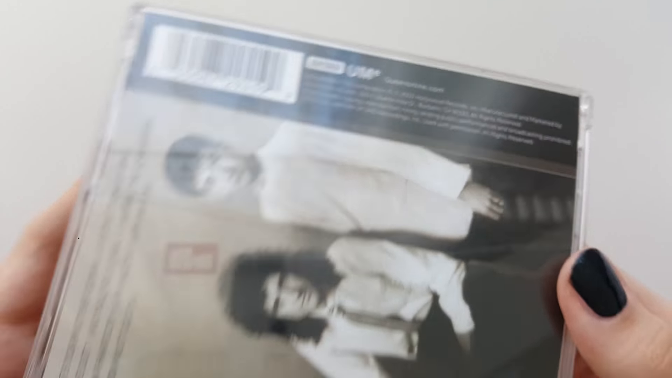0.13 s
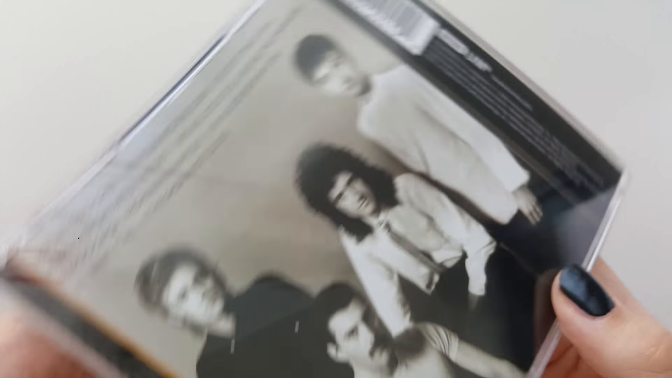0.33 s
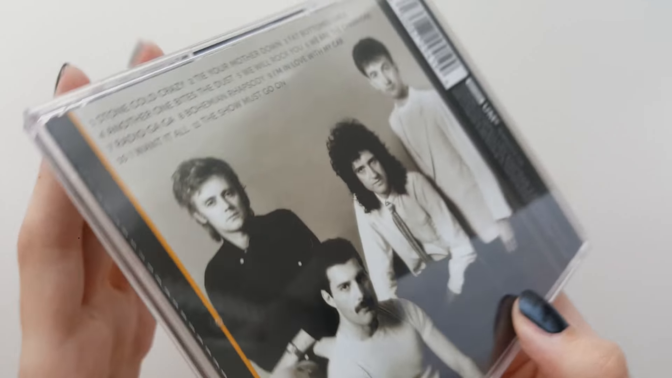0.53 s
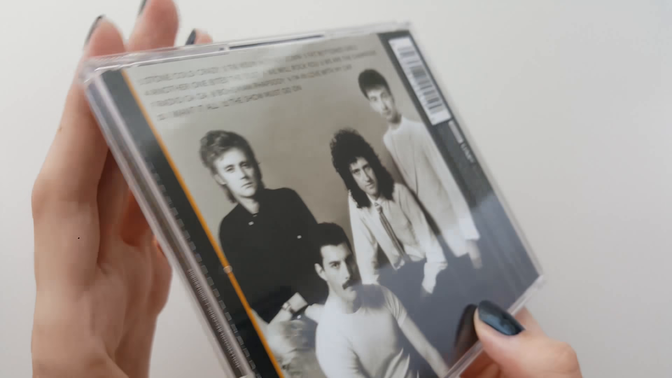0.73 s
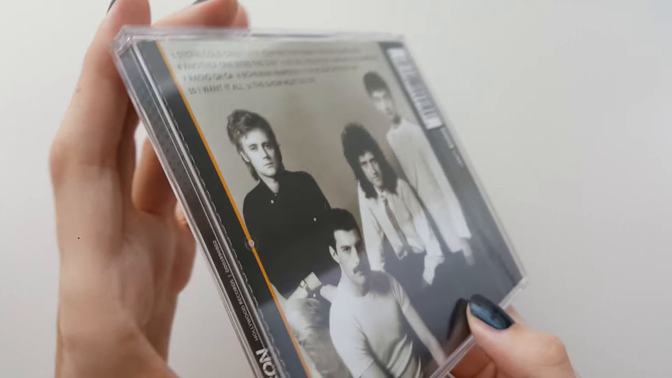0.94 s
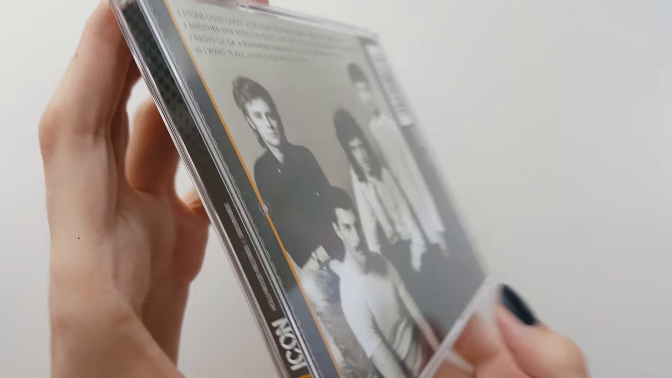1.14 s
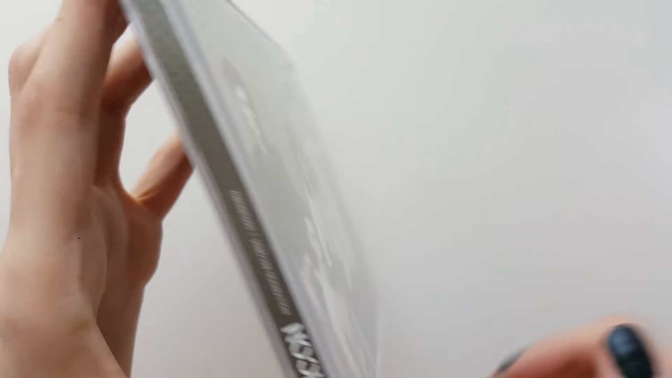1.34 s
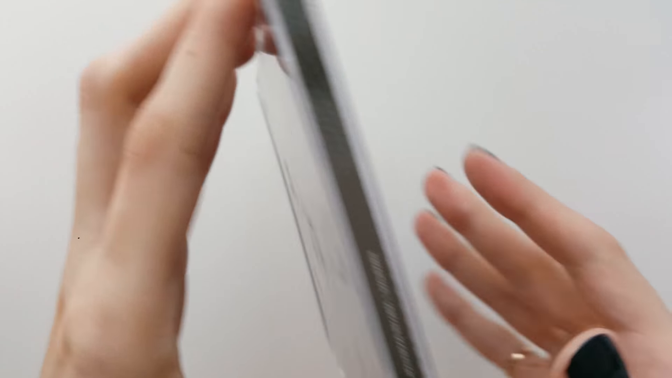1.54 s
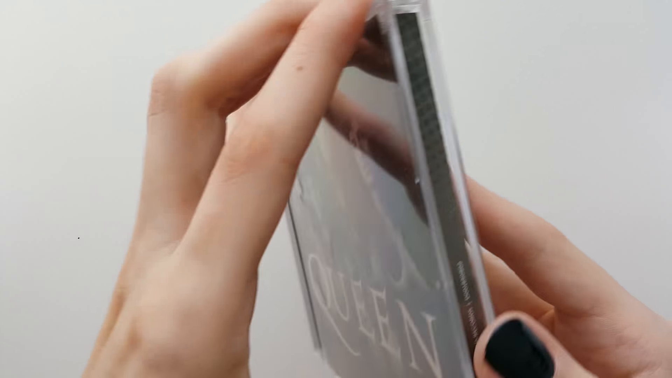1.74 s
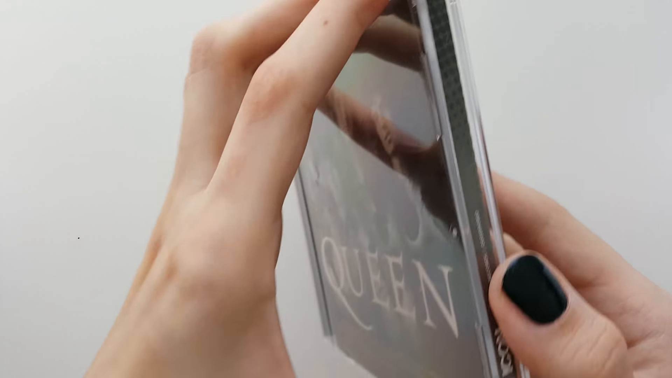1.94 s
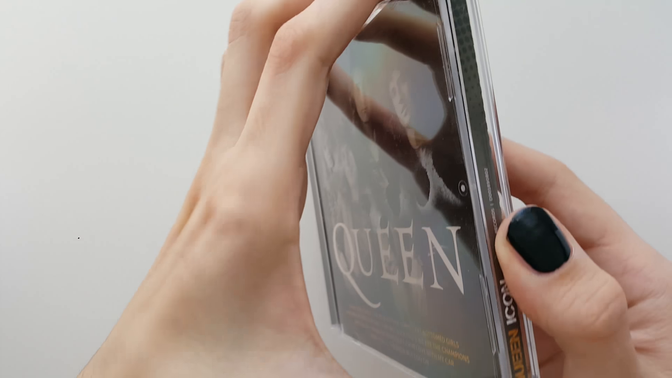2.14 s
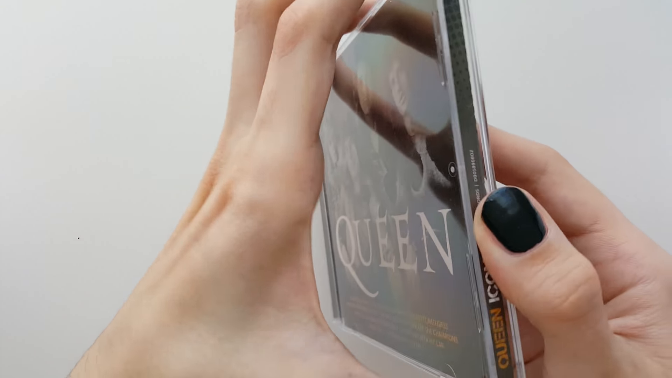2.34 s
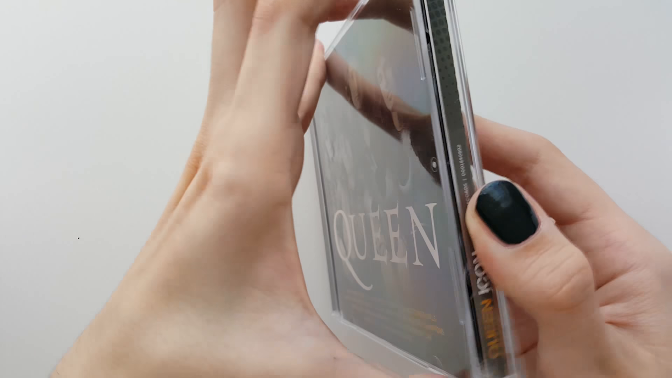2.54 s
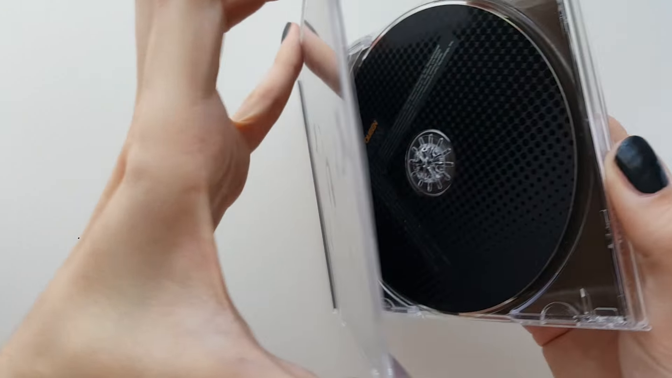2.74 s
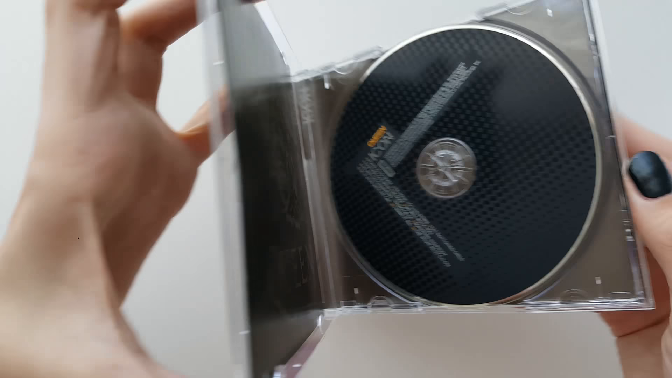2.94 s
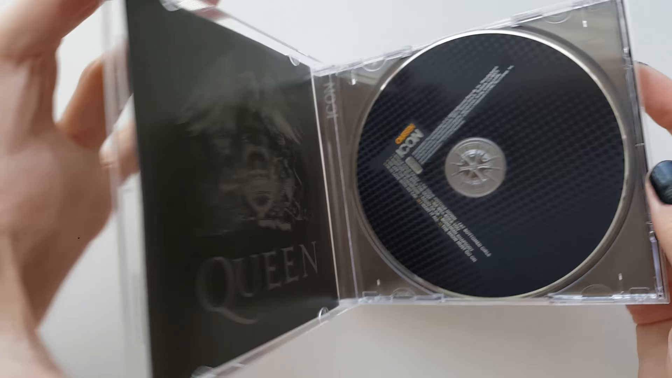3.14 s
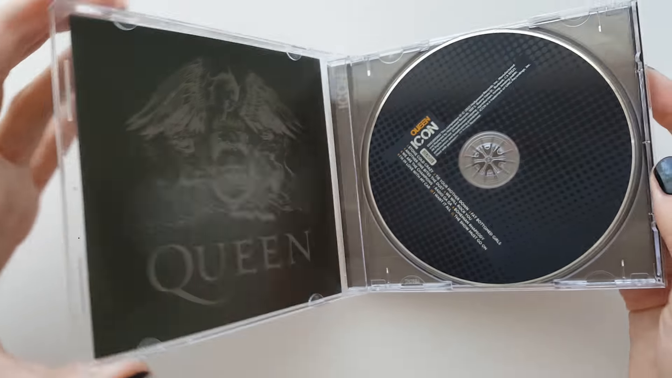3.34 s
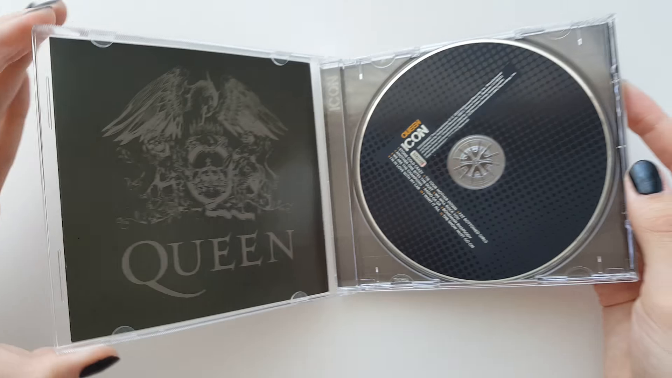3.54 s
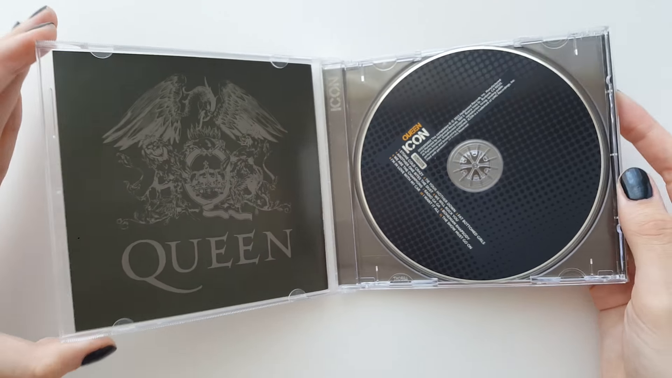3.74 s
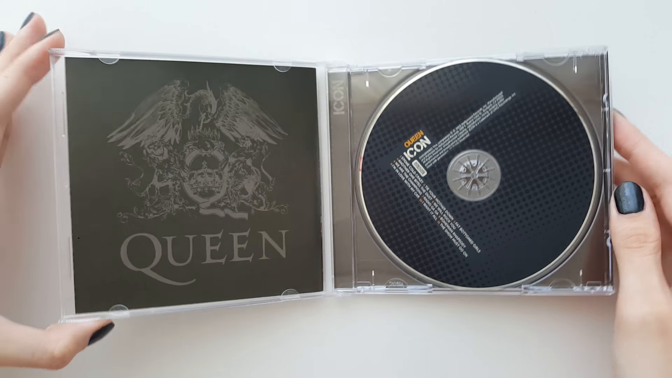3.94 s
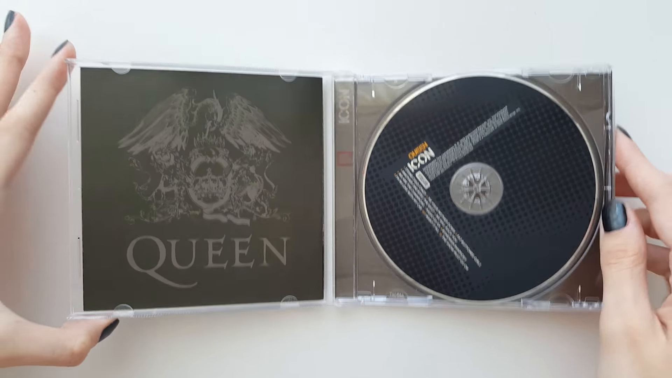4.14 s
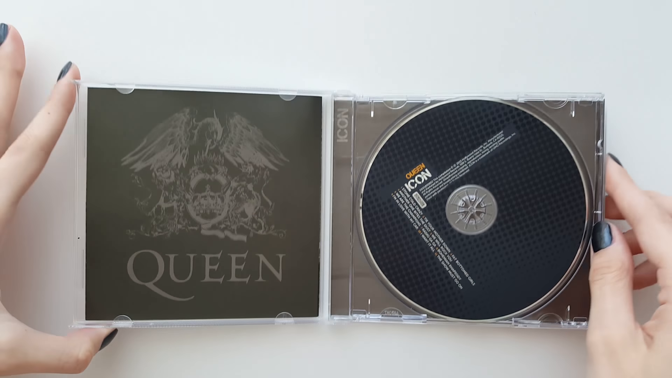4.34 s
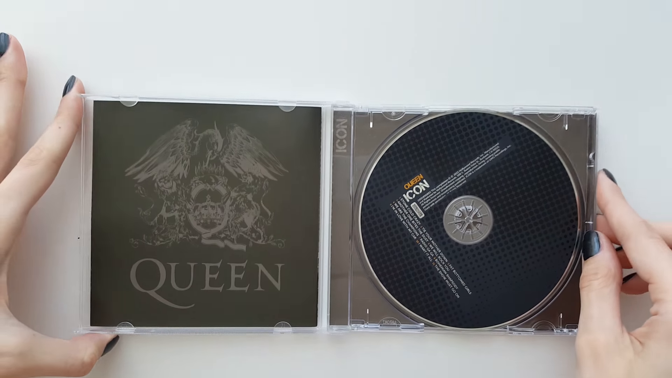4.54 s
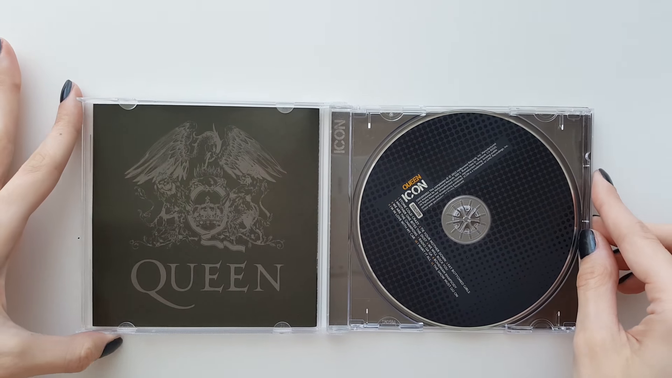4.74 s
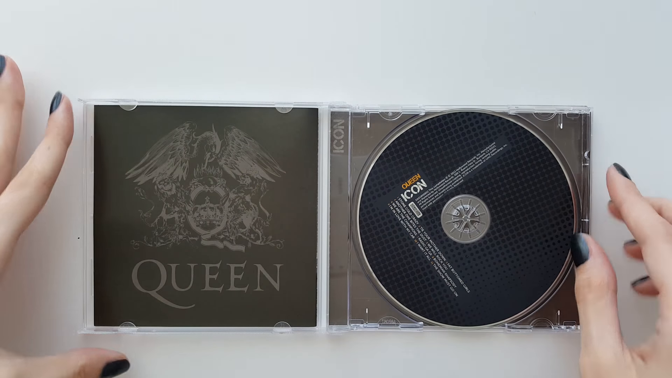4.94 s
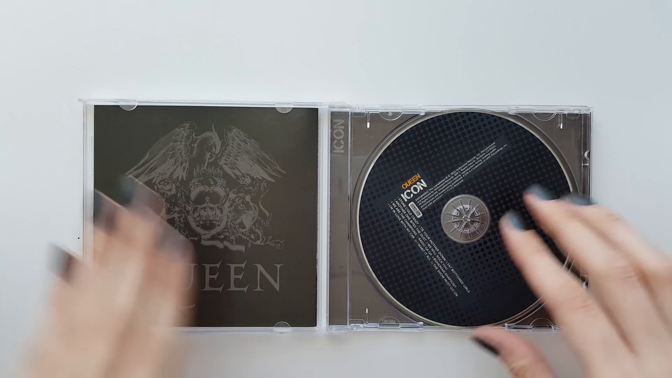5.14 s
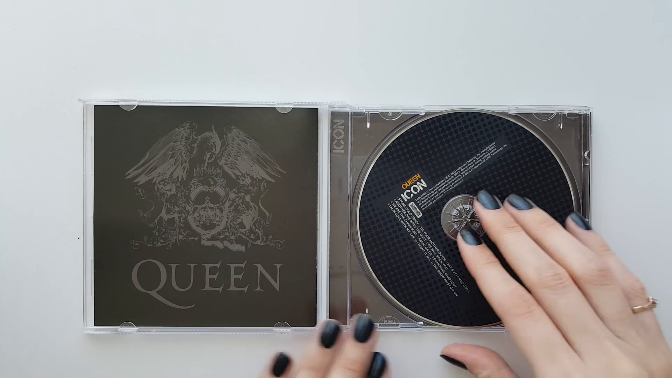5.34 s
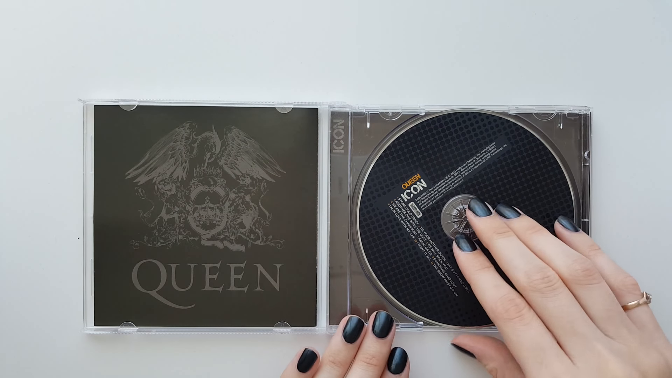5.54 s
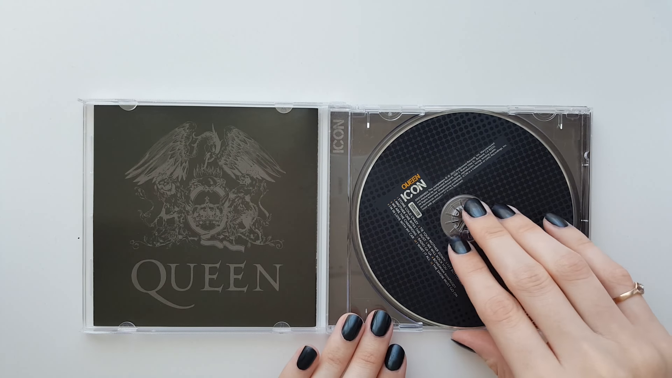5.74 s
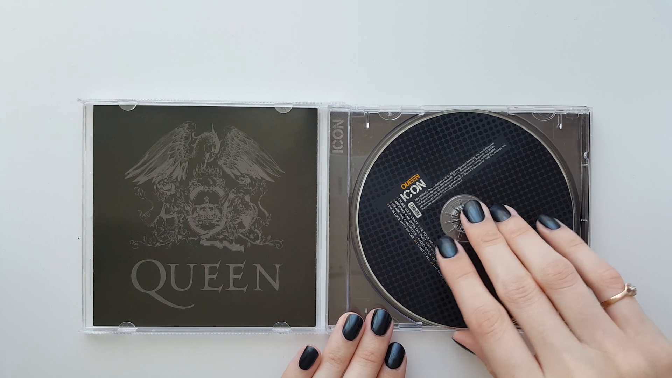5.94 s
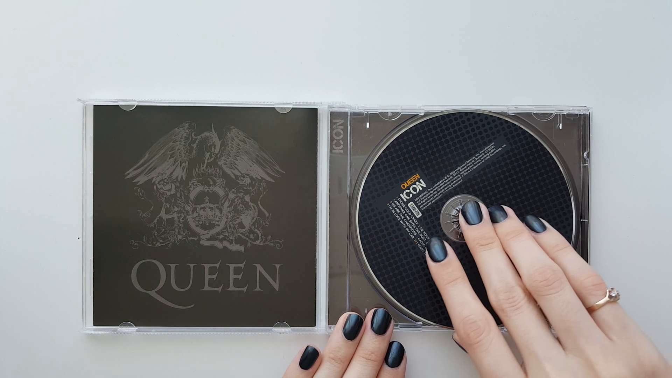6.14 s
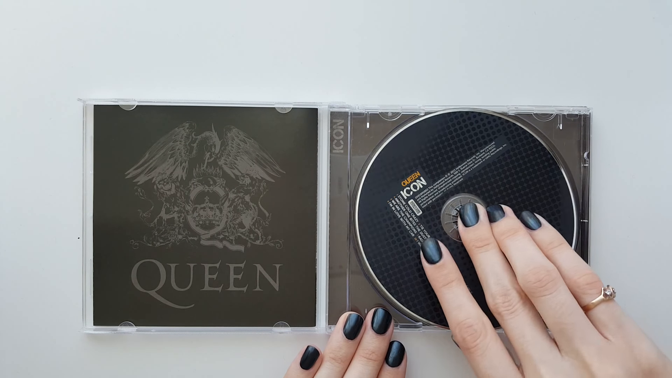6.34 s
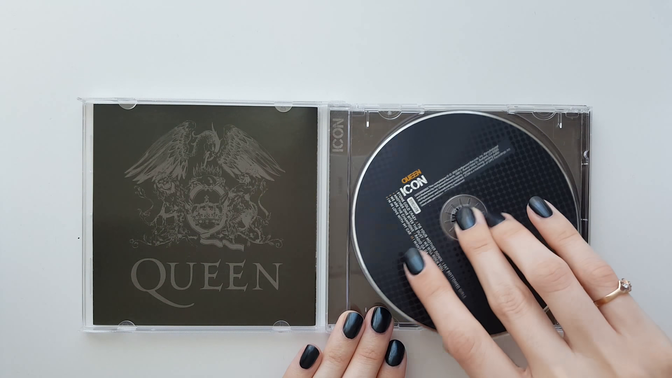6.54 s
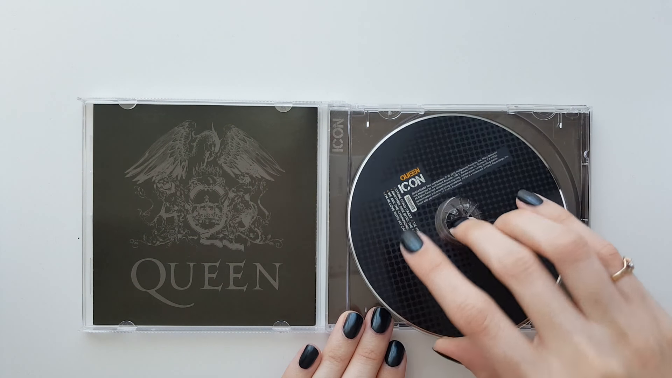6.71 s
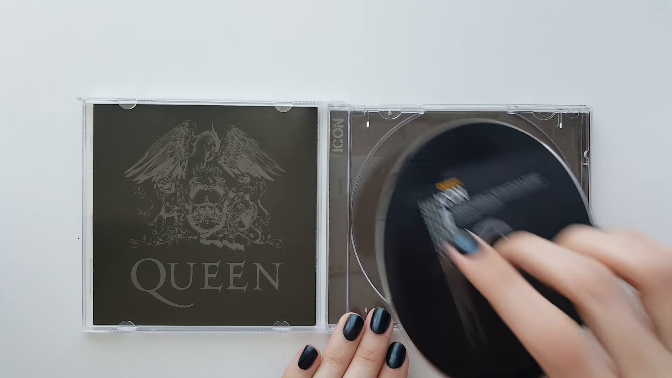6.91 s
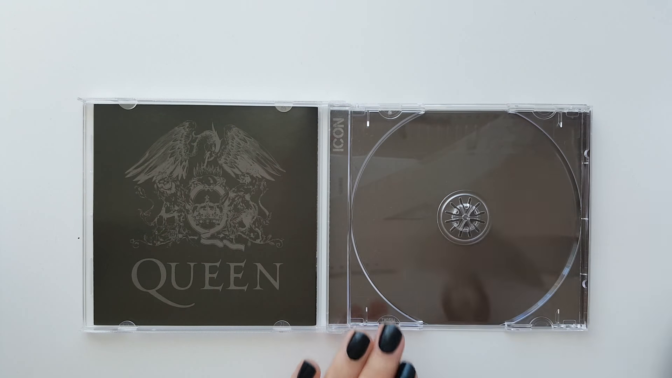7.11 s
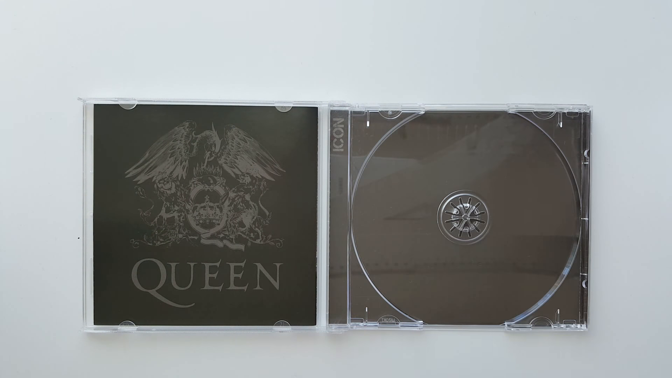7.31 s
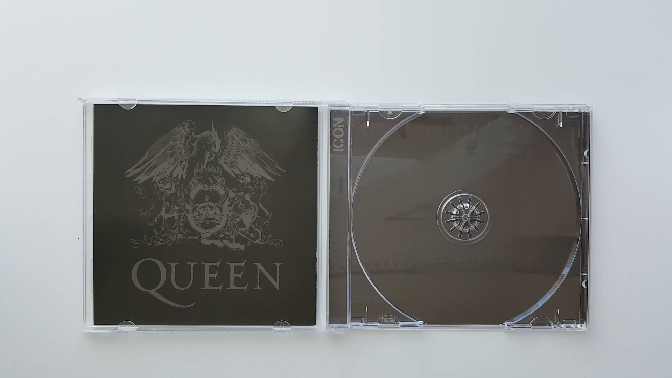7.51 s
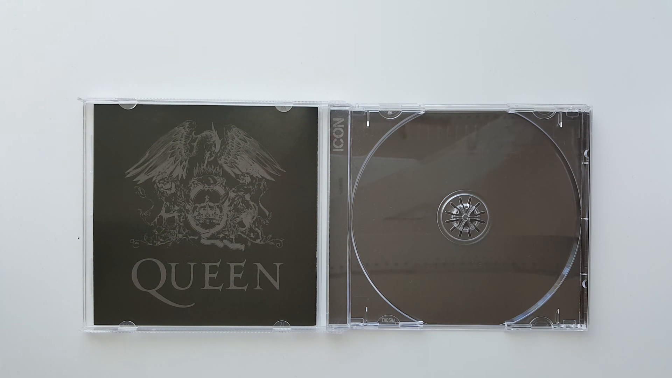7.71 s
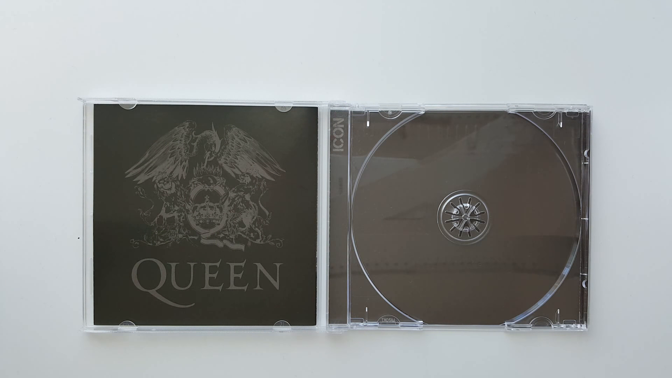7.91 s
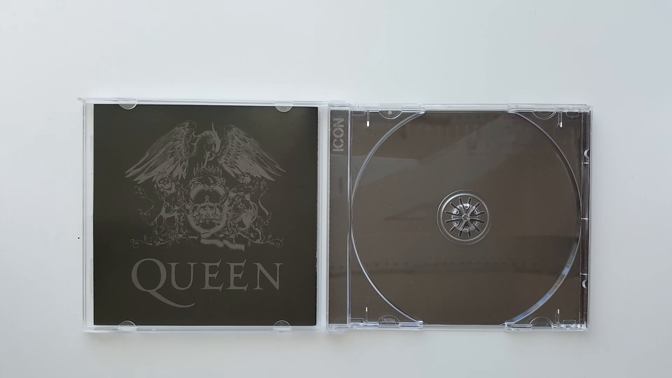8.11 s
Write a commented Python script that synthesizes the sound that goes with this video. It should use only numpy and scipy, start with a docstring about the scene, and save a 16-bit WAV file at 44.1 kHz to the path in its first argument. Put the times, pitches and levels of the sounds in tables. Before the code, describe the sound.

Thin hard plastic case is handled, creaks and clicks open, clatters flat on a table, then a disc snaps sharply off its hub.

```python
"""A plastic disc case is turned over in the hands, prised open, laid on a table and its disc popped off the hub.
Each contact is a short dense noise burst, filtered by the modes and broad colour of the struck plate.
Friction is noise in uneven slips under a swelling pressure; slipping skin and the tapped disc hum briefly.
A small, hard room adds a decaying tail; air noise, hiss and a faint whine lie behind.
Two microphone ports listen from close by."""
import sys
import numpy as np
from scipy import signal
from scipy.fft import rfft, irfft
from scipy.io import wavfile
from scipy.ndimage import uniform_filter1d

SR = 44100
rng = np.random.default_rng(int(sys.argv[2]) if len(sys.argv) > 2 else 0)


def put_to_file(sound):
    """Save the sound as 16-bit audio at rate SR, in the file named by the first command-line argument."""
    columns = np.atleast_2d(sound).T  # one column per channel
    safe = np.clip(columns, -1, 1)
    whole_steps = np.round(safe * 32767)
    wavfile.write(sys.argv[1], SR, whole_steps.astype(np.int16))


N = 360268
SIZE = 2 ** 15  # samples in a burst or a room response
HZ = np.fft.rfftfreq(SIZE, 1 / SR)

# In the blow tables the level is the rms over 10 ms, before hardness and thump reshape the spectrum;
# strokes give their peak level, hums their own rms.
# Hardness is a spectral tilt: a nail lies above 0, a fingertip below.
# Broad colour of the tray: f/Hz, level/dB (per Hz)
TRAY_COLOUR = [(45, -13), (95, 4.5), (175, -3.5), (250, 1.5), (350, -1), (550, -6), (750, -6.5),
               (1300, -7.5), (2800, -12), (3600, -17), (6000, -25), (10000, -34), (15000, -48)]
# Modes of the tray: f/Hz, width/Hz, lift/dB
TRAY_RESONANCES = [(107.6, 15, 4.5), (141.4, 6, 6.6), (333, 25, 5.2), (390, 7.6, 7.8), (547, 44, 12)]


def gain_of(db):
    """Level law: twenty decibels are a factor of ten in amplitude."""
    return 10 ** (np.asarray(db) / 20)


def evened(x):
    """Normalisation: scales a signal to an rms of one."""
    return x / np.sqrt(np.mean(x ** 2) + 1e-20)


def read(points, hz):
    """Interpolation: reads a curve on a log-frequency axis."""
    f, value = np.transpose(points)
    return np.interp(np.log(hz + 1), np.log(f + 1), value)


def add(mix, s, sound):
    """Superposition: mixes a two-channel sound in at time s."""
    part = mix[:, round(s * SR):][:, :sound.shape[1]]
    part += sound[:, :part.shape[1]]


def causal(db):
    """Minimum phase: the response with these levels that rings only after it is struck."""
    log_gain = np.log(gain_of(np.concatenate([db, db[-2:0:-1]])))
    return np.exp(np.conj(signal.hilbert(log_gain)))[:len(db)]


def levelled(waves, size):
    """Whitening: spectra without their broad humps and dips; fine ripple and the attack stay."""
    spectra = []
    for z in rfft(waves, SIZE):
        power = uniform_filter1d(abs(z) ** 2, size=size)
        spectra.append(z / causal(10 * np.log10(power + 1e-9)))
    return np.array(spectra)


def at_ports(pair, colour=None):
    """Diffuse-field coherence: long waves reach both ports alike, short ones do not."""
    # Likeness of diffuse sound at the two ports: f/Hz, correlation/1
    likeness = [(60, 0.96), (340, 0.46), (560, 0.31), (1000, 0.0082), (2500, 0.022), (5000, -0.047)]
    hz = np.fft.rfftfreq(pair.shape[1], 1 / SR)
    same = np.clip(read(likeness, hz), -1, 1)
    gain = 1 if colour is None else gain_of(read(colour, hz))
    mid, side = rfft(pair) * np.sqrt([1 + same, 1 - same]) * gain
    return evened(irfft(np.array([mid + side, mid - side]), pair.shape[1]))


def background(air_db=-67.0, hiss_db=-82, whine_hz=1362):
    """Steady noise floor: room rumble, a thin electrical whine mostly on the right, and microphone hiss."""
    # Colour of the room air: f/Hz, level/dB (per Hz)
    air_colour = [(10, -9.5), (38, -10.5), (58, 1), (105, -8), (141, -1), (175, -10), (280, -11.5),
                  (450, -15.5), (1300, -19.5), (3000, -23.5), (6000, -30), (10000, -34), (15800, -32)]
    # Colour of the microphone hiss: f/Hz, level/dB (per Hz)
    hiss_colour = [(100, -14.5), (9500, -9), (12500, 2.5), (15800, 3.5)]
    # Whine at the ports: left level/dB, right level/dB
    whine_db = (-96, -78)
    air = gain_of(air_db) * at_ports(rng.standard_normal((2, N)), air_colour)
    tone = evened(np.sin(2 * np.pi * whine_hz * np.arange(N) / SR))
    whine = tone * gain_of(whine_db)[:, None]
    hiss = gain_of(hiss_db) * at_ports(rng.standard_normal((2, N)), hiss_colour)
    return air + whine + hiss


def flutter(rise_ms, fall_ms, grit_db):
    """Dispersive bending waves cross a plate and die away: spectra of a burst, gritty where an edge catches."""
    ms = 1000 * np.arange(SIZE) / SR
    build_up = 1 - np.exp(-ms / max(rise_ms, .02))
    decay = np.exp(-ms / max(fall_ms, .5))
    catches = evened(uniform_filter1d(rng.standard_normal(SIZE), size=60))
    burst = rng.standard_normal((2, SIZE)) * build_up * decay * gain_of(grit_db * catches)
    return levelled(burst, size=110)


def blows(rows, body, modes, rise_ms, fall_ms, thump_db, lead_ms, spread,
          grit_db=1, thump_hz=300, pivot_hz=1200, split_hz=580):
    """Impact excitation of plate modes: a hard contact is bright and sudden, a soft one thumps."""
    soft_thump_db, soft_slowing = 0.95, .15  # added thump and log build-up time per dB/octave softer
    margin = 64  # samples that let either port hear the blow first
    resonance_db = sum(lift / (1 + (2 * (HZ - f) / width) ** 2) for f, width, lift in modes)
    colour_db = read(body, HZ) + resonance_db
    colour_db = colour_db - 10 * np.log10(np.mean(gain_of(colour_db) ** 2))
    # above the bass, the plate sends each port a different wave
    apart = np.clip(spread, 0, 1) * HZ ** 4 / (HZ ** 4 + split_hz ** 4)
    # the left port leads by lead_ms: half the delay goes to each side
    turn = np.exp(1j * np.pi * HZ * lead_ms / 1000)
    out = np.zeros((2, N))
    for s, db, hardness in rows:
        low_db = (thump_db - soft_thump_db * hardness) / (1 + (HZ / thump_hz) ** 4)
        tilt_db = hardness * np.log2(np.maximum(HZ / pivot_hz, 1 / 2))
        burst = flutter(rise_ms * np.exp(-soft_slowing * hardness), fall_ms, grit_db)
        mid, side = burst * np.sqrt([1 - apart ** 2, apart ** 2])
        ports = np.array([(mid + side) * turn, (mid - side) / turn])
        z = ports * causal(colour_db + low_db + tilt_db + db)
        wave = np.roll(irfft(z), margin, axis=1)[:, :SIZE // 2]
        # the level counts the energy as spread over 10 ms
        add(out, s - margin / SR, wave * np.sqrt(SR / 100))
    return out


def by_force(rows, hardness=0., per_db=0.):
    """Hardness by level: that of the strongest blow, plus per_db times each blow's level relative to it."""
    top_db = max(db for s, db in rows)
    return [(s, db, hardness + per_db * (db - top_db)) for s, db in rows]


def finger_taps():
    """Impact: fingers tap the shut case, whose plates ring briefly."""
    # Taps: t/s, level/dB, hardness/(dB/octave)
    taps = [(.059, -67, -2.5), (.827, -61.5, -1), (.8765, -50, 2.5), (.888, -51.5, 3.5),
            (.9425, -54.5, 1.5), (2.600, -53.5, 3), (2.987, -63, 4)]
    # Colour of the shut case: f/Hz, level/dB (per Hz)
    colour = [(100, -2), (250, 0), (900, -5.5), (1400, -9.5), (2200, -12), (5000, -25), (10000, -36),
              (15000, -40)]
    # Mode of the shut case: f/Hz, width/Hz, lift/dB
    modes = [(1335, 290, 20)]
    return blows(taps, colour, modes, rise_ms=0.22, fall_ms=5.0, thump_db=3.0, lead_ms=0.039, spread=0.13)


def room(x, wet_db=-3, first_s=0.00089, build_s=0.0017):
    """Reverberation: reflections from table and walls thicken into a tail; each band decays at its own rate."""
    # Decay of the room: f/Hz, t60/s
    decay_times = [(120, 0.36), (500, .45), (1400, 0.33), (3700, 0.36), (10000, 0.31), (16000, 0.17)]
    reflections = rng.standard_normal((2, SIZE)) * (rng.random((2, SIZE)) < 4000 / SR)  # 4000 per second
    hz, t, z = signal.stft(at_ports(reflections), SR, nperseg=256)
    decay = gain_of(-60 * t / read(decay_times, hz)[:, None])
    tail = signal.istft(z * decay, SR, nperseg=256)[1]
    since_first = np.maximum(np.arange(tail.shape[1]) / SR - first_s, 0)
    tail = tail * (1 - np.exp(-since_first / build_s))
    response = irfft(levelled(tail, size=40))
    return gain_of(wet_db) * signal.fftconvolve(x, response, axes=1)[:, :N]


def lid_ticks():
    """Short impacts of the lid: it shifts on its hinge pins, and at 2.6835 s a catch snaps."""
    # Ticks: t/s, level/dB, hardness/(dB/octave)
    ticks = [(.741, -57.5, 0), (.901, -43.5, -0.73), (2.6835, -50.5, 2), (3.517, -58, 1),
             (3.575, -57.5, -2.5)]
    # Colour of the lid: f/Hz, level/dB (per Hz)
    colour = [(60, -13), (130, -8), (220, -19), (600, -1), (900, -3), (1400, 0.5), (3500, -1), (8000, -9),
              (11000, -20), (15000, -23)]
    # Modes of the lid: f/Hz, width/Hz, lift/dB
    modes = [(324, 48, 9), (563, 160, 10.4), (1300, 340, 7.8)]
    return blows(ticks, colour, modes, rise_ms=0.23, fall_ms=7.0, thump_db=8, lead_ms=.1, spread=0.62)


def rub(strokes, colour, skew, grain_db, grain_s=0.0016):
    """Friction: noise in uneven slips; each stroke swells and eases off, peaking early if skew is under one."""
    t = np.arange(N) / SR
    pressure = np.zeros(N)
    for s, length, db in strokes:
        progress = np.clip((t - s) / length, 0, 1)
        pressure += gain_of(db) * np.sin(np.pi * progress ** skew)
    slips = evened(uniform_filter1d(rng.standard_normal(N), max(int(grain_s * SR), 1)))
    return pressure * at_ports(rng.standard_normal((2, N)) * gain_of(grain_db * slips), colour)


def grip_rub():
    """Friction of skin on plastic: the fingers shift their grip on the shut case."""
    # Strokes: t/s, length/s, peak level/dB
    strokes = [(1.24, 0.25, -67.5), (1.52, .19, -64)]
    # Colour of the rubbing: f/Hz, level/dB (per Hz)
    colour = [(60, 3), (150, 1), (300, -4.5), (470, -9), (700, -34), (2000, -39), (8000, -56)]
    return rub(strokes, colour, skew=.75, grain_db=3)


def lid_creak():
    """Release of bending strain: the lid creaks under the prising fingers."""
    # Creaks: t/s, level/dB
    creaks = [(2.354, -50), (2.359, -41.5), (2.374, -53)]
    # Colour of the bent lid: f/Hz, level/dB (per Hz)
    colour = [(60, -11), (140, -1), (220, -10), (330, 1), (480, -10.5), (800, -9), (1600, -2.5),
              (3000, -11), (7000, -15), (10000, -27), (15000, -34)]
    # Modes of the bent lid: f/Hz, width/Hz, lift/dB
    modes = [(1455, 110, 9.3), (1540, 42, 3.3), (1820, 70, 12), (2530, 79, 4.6)]
    return blows(by_force(creaks, hardness=-.5, per_db=-0.15), colour, modes,
                 rise_ms=2.0, fall_ms=4.5, thump_db=-.8, lead_ms=0.099, spread=0.61)


def brief_hums(jitter=0.13, overtone_db=-14):
    """Tones of unsteady frequency: skin slipping on plastic, and at 6.641 s the tapped disc ringing on."""
    # Brief hums: t/s, length/s, level/dB, f/Hz
    hums = [(2.594, 0.025, -62, 551), (4.689, 0.058, -57, 547), (4.995, 0.074, -65.5, 560),
            (6.641, 0.054, -64, 624), (6.98, 0.081, -75, 546)]
    out = np.zeros((2, N))
    for s, length, db, hz in hums:
        n = int(length * SR)
        waver = evened(uniform_filter1d(rng.standard_normal(N), size=150))[:n]
        phase = 2 * np.pi * np.cumsum(hz * (1 + jitter * waver)) / SR
        tone = np.sin(phase) + gain_of(overtone_db) * np.sin(2 * phase)
        hum = evened(tone * np.hanning(n))
        add(out, s, gain_of(db) * np.array([hum, hum]))
    return out


def catch_slips():
    """Stick-slip release: the lid scrapes free of its catches in gritty bursts."""
    # Slips: t/s, level/dB, hardness/(dB/octave)
    slips = [(2.608, -46, 0), (2.619, -48, 0.5), (2.6285, -39.5, -.3), (2.691, -48.5, 4)]
    # Colour of the catches: f/Hz, level/dB (per Hz)
    colour = [(45, -5), (100, 2), (220, -8), (550, 0), (800, -0.5), (1400, -3), (2100, -1.5), (3500, -7.5),
              (7000, -14.5), (10000, -23.5), (15000, -27)]
    # Modes of the catches: f/Hz, width/Hz, lift/dB
    modes = [(1310, 100, 5.5), (1640, 45, 2.8), (1920, 130, 6), (2450, 62, 3.2), (3400, 130, 4.8)]
    return blows(slips, colour, modes, rise_ms=2.1, fall_ms=10.8, thump_db=2.5, lead_ms=-0.366, spread=0.79,
                 grit_db=3.5)


def hinge_rub():
    """Friction in a bearing: the hinge rubs as the lid swings open."""
    # Stroke: t/s, length/s, peak level/dB
    strokes = [(3.21, 0.34, -69.5)]
    # Colour of the hinge: f/Hz, level/dB (per Hz)
    colour = [(150, -3), (400, -9), (580, 3), (720, 8), (900, -11), (2500, -17), (5500, -10), (10000, -25),
              (15000, -38)]
    return rub(strokes, colour, skew=0.53, grain_db=1.0)


def table_knocks():
    """Impact: the tray meets the table and settles under the fingers."""
    # Knocks: t/s, level/dB, hardness/(dB/octave)
    knocks = [(3.626, -39.5, 0.76), (3.806, -33.5, 0.5), (3.815, -41.5, -2), (3.849, -52, -5),
              (4.497, -57.5, -5.5), (4.602, -61, -3), (4.666, -53, -4), (4.695, -47, -4.5),
              (4.741, -59, -8.5), (4.775, -69.5, -11)]
    return blows(knocks, TRAY_COLOUR, TRAY_RESONANCES,
                 rise_ms=0.57, fall_ms=5.9, thump_db=-3.5, lead_ms=0.12, spread=0.77)


def table_slide():
    """Sliding friction: the open case is nudged across the table."""
    # Nudges: t/s, length/s, peak level/dB
    strokes = [(3.765, 0.082, -61.5), (4.06, 0.13, -62.5), (4.19, .14, -55.5), (4.32, 0.095, -60),
               (4.41, 0.21, -65), (4.71, .14, -75)]
    # Colour of plastic on the table: f/Hz, level/dB (per Hz)
    colour = [(70, -5), (150, -0.5), (400, 4.5), (700, -1.5), (1300, -4), (2200, -7), (3700, -7),
              (6000, -19.5), (10000, -28), (15000, -40)]
    return rub(strokes, colour, skew=0.47, grain_db=3.0)


def bounces(count=5):
    """Restitution: ever quicker and weaker landings of the lid, near corner then far corner."""
    drop_s, drop_db = 3.928, -29.5
    first_bounce_s, rebound = .028, .78  # each bounce lasts this share of the one before
    loss_db = 0.2  # grows with the cube of the bounce number
    corner_lag, corner_db = .3, -4  # the far corner lands this share of a bounce later, and weaker
    rows, s = [], drop_s
    for k in range(count):
        gap = first_bounce_s * rebound ** k
        db = drop_db - loss_db * k ** 3
        rows += [(s, db), (s + corner_lag * gap, db + corner_db)]
        s += gap
    return rows


def lid_chatter():
    """Repeated impact: the open lid drops on the table and chatters, duller as it weakens."""
    # Colour of the open lid: f/Hz, level/dB (per Hz)
    colour = [(80, -48), (220, -17), (400, -13), (600, -7.5), (850, -10.5), (1400, -3), (2400, -9.5),
              (3300, -22), (4300, -16.5), (6500, -28.5), (10000, -34), (15000, -47)]
    # Modes of the open lid: f/Hz, width/Hz, lift/dB
    modes = [(703, 39, 6.5), (1010, 110, 6.2), (1047, 74, 4.6), (1250, 27, 4.3), (1320, 36, 10.4),
             (1450, 11, 6.6), (1714, 67, 7), (2320, 63, 8.8)]
    return blows(by_force(bounces(), hardness=-0.46, per_db=0.44), colour, modes,
                 rise_ms=0.2, fall_ms=9.9, thump_db=-11.5, lead_ms=0.348, spread=0.59, grit_db=0)


def nail_flick():
    """Hard contact: a fingernail flicks off the rim of the tray and excites its treble."""
    # Flick: t/s, level/dB, hardness/(dB/octave)
    flick = [(4.876, -44.5, 2.45)]
    return blows(flick, TRAY_COLOUR, TRAY_RESONANCES,
                 rise_ms=1.1, fall_ms=15, thump_db=-6.0, lead_ms=-0.25, spread=0.54)


def hub_press():
    """Sudden yielding: the hub gives under the finger."""
    # Press: t/s, level/dB
    press = [(6.232, -26.5)]
    # Colour of the hub: f/Hz, level/dB (per Hz)
    colour = [(60, -21), (140, -9), (250, -12.5), (470, 3.5), (800, 0), (1150, -6), (1450, -0.5), (2000, 0),
              (2300, -10), (2900, 3), (3900, -14), (6000, -19), (9000, -31), (15000, -38)]
    # Modes of the hub: f/Hz, width/Hz, lift/dB
    modes = [(136, 16, 7), (460, 33, 4.3), (550, 40, 4), (2750, 210, 3.8), (3180, 54, 7.8)]
    return blows(by_force(press), colour, modes, rise_ms=.08, fall_ms=5.5, thump_db=2.0, lead_ms=.45, spread=0.73)


def hub_snap():
    """Release of elastic strain: the teeth of the hub let the disc snap free."""
    # Snaps: t/s, level/dB
    snaps = [(6.3375, -21), (6.3415, -27.5), (6.348, -31)]
    # Colour of the snap: f/Hz, level/dB (per Hz)
    colour = [(60, -19.5), (210, -19), (325, 0.5), (460, -7.5), (750, 0), (1150, -7), (1900, -4.5),
              (3400, -5.5), (4700, -7.5), (6500, -16), (9000, -24), (12000, -32.5), (15500, -42)]
    # Modes heard in the snap: f/Hz, width/Hz, lift/dB
    modes = [(140.5, 27.5, 17), (277, 51, 6.2), (336.6, 71, 3), (385, 55, 8.1), (710, 9.7, 2),
             (736, 28, 6.7), (850, 25.54, 3.03), (963, 40, 8.8), (1882, 50, 4.2), (2400, 91, 4.9),
             (3156, 40, 4), (3323, 36, 3), (3565, 44, 9.2)]
    return blows(by_force(snaps, hardness=0.76, per_db=0.12), colour, modes,
                 rise_ms=.5, fall_ms=6.5, thump_db=2.5, lead_ms=0.12, spread=0.75)


def disc_taps():
    """Impact: the loose disc tips against the tray."""
    # Taps: t/s, level/dB
    taps = [(6.567, -42), (6.6035, -43), (6.616, -50)]
    # Colour of the disc: f/Hz, level/dB (per Hz)
    colour = [(35, -0.5), (80, -3), (210, -14), (350, -2), (680, 0.5), (1150, -3), (1400, -2), (2000, -5.5),
              (3500, -10.5), (6000, -16), (10000, -29), (15000, -33)]
    # Modes of the disc: f/Hz, width/Hz, lift/dB
    modes = [(140, 9.9, 7.6), (607, 33, 9.8), (633, 29, 7.9), (710, 17, 3), (844, 25, 4.4), (1370, 66, 6.6),
             (1880, 44, 8.6)]
    return blows(by_force(taps, hardness=-.1), colour, modes,
                 rise_ms=1.0, fall_ms=10.8, thump_db=2.0, lead_ms=0.072, spread=0.54)


def scene():
    """Superposition of direct sound, reverberation and noise floor."""
    held = finger_taps() + lid_ticks() + lid_creak() + catch_slips()
    rubs_and_hums = grip_rub() + brief_hums() + hinge_rub() + table_slide()
    laid = table_knocks() + lid_chatter() + nail_flick() + rubs_and_hums
    freed = hub_press() + hub_snap() + disc_taps()
    # held up near the microphone, the case is drier than on the table
    direct = held + laid + freed
    reverberant = room(held, wet_db=-5.5) + room(laid, wet_db=-4.0) + room(freed, wet_db=-5)
    return direct + reverberant + background()


def record(dry):
    """Band limiting: the recorder passes only what lies below its upper edge."""
    edge_hz = 15900
    low_pass = signal.firwin(511, edge_hz, window=("kaiser", 9), fs=SR)
    return signal.oaconvolve(dry, low_pass[None], "same")


dry = scene()
out = record(dry)
put_to_file(out)
```